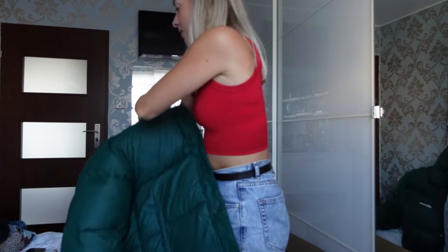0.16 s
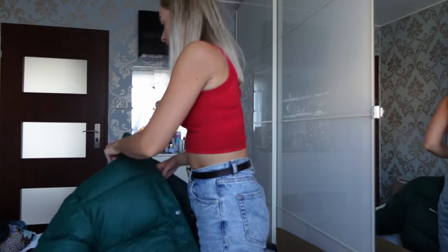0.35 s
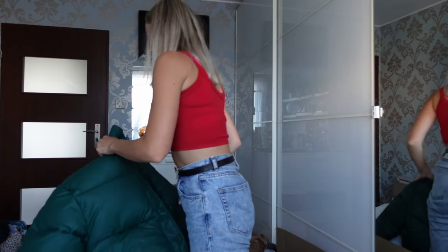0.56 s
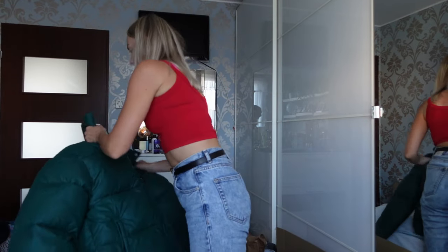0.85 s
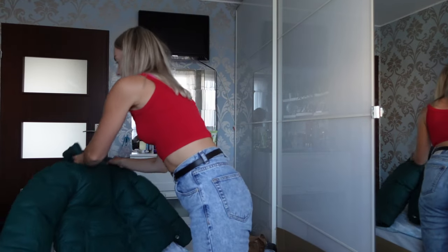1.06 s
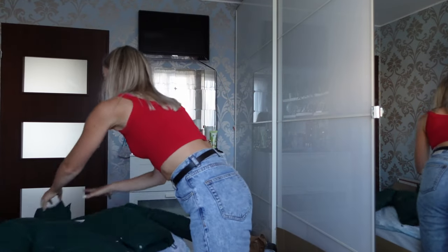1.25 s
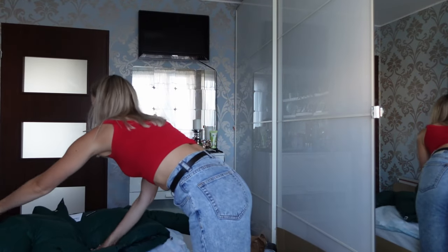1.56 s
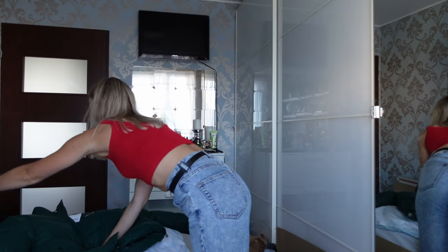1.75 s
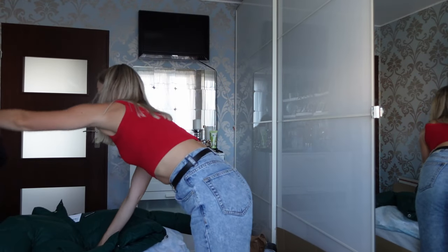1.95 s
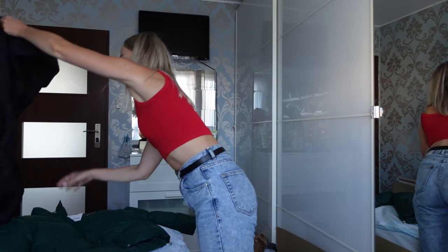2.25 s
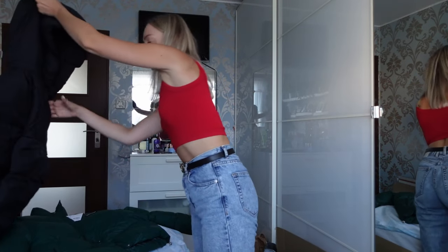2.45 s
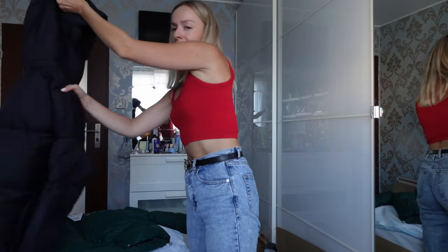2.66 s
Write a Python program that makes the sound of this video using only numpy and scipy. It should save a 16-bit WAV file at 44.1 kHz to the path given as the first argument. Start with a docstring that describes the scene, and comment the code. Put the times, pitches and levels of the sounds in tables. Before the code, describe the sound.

Close, dry rustle of padded nylon jackets in a small furnished room: dull padding rub under bright hiss, one sharp scrape and crack near the start, smaller snaps midway, a thinner lull, then a final swish.

```python
"""A small bedroom, close on the bed: padded nylon jackets are handled before two microphones,
one folded over and laid on the bed, another lifted. Shells hiss and crinkle (filtered noise and clicks)
over the duller rub, low swells and bumps of the padding. Folds rasp and snap (noise bursts), the ribbed
weave zips (gliding tones). The room answers with a diffuse decaying field, the ceiling with one echo of the folds."""
import sys
import numpy as np
from scipy import signal
from scipy.fft import rfft, irfft, next_fast_len
from scipy.io import wavfile
from scipy.ndimage import map_coordinates

SR = 44100
rng = np.random.default_rng(int(sys.argv[2]) if len(sys.argv) > 2 else 0)


def generate_wav(signal):
    """Clip the signal to [-1, 1] and save it as 16-bit WAV at the path in sys.argv[1]."""
    frames = np.transpose(np.atleast_2d(signal))
    scaled = np.clip(frames, -1, 1) * 32767
    pcm = np.round(scaled).astype(np.int16)
    wavfile.write(sys.argv[1], SR, pcm)


N = 123479  # length [samples]

# Colours give only the shape of a spectrum; stroke widths are Gaussian standard deviations.
# Room air: (frequency [Hz], level [dB])
AIR_COLOUR = [(25, -2), (60, -8), (150, 4), (400, -6.5), (1000, 6), (15000, -4)]
# Decay of the room: (frequency [Hz], time to fall 60 dB [s])
ROOM_DECAY = [(150, 0.25), (600, 0.3), (1500, 0.2), (4000, 0.2), (9000, 0.28), (15000, 0.13)]
# Likeness of the room field at the two microphones: (frequency [Hz], correlation [0-1])
ROOM_LIKENESS = [(100, 1), (500, 0.71), (1500, 0.55), (4000, 0.43), (8000, 0.25), (13000, 0.24)]
# Colour of the ceiling echo: (frequency [Hz], level [dB])
CEILING_COLOUR = [(100, -3), (1500, -4.5), (4000, 0), (10000, 3), (16000, 1.5)]

# Pressing on the padding: (time [s], level of the rub before its trim [dB])
PRESSING = [(0, -40), (.04, -53.5), (.13, -44.5), (.3, -42), (.42, -43.5), (.6, -44.5), (.75, -47),
            (.86, -46), (.96, -44), (1.17, -46.5), (1.35, -45), (1.6, -50.5), (1.8, -48), (2.0, -53.5),
            (2.22, -50), (2.43, -56.5), (2.58, -48), (2.8, -54)]
# Dull rub of the padding: (frequency [Hz], level [dB])
RUB_COLOUR = [(30, -59), (100, -43), (200, -33), (260, -28.5), (330, -20.5), (430, -10), (520, .5),
              (650, -6), (790, 1.5), (1400, 2), (2200, -.5), (4000, -16), (10000, -53.5)]
# Hands scuffing the padding: (time [s], level [dB], width [s], pitch ratio of the hollow under the hand)
SCUFF_STROKES = [(.062, -46, 0.011, 0.63), (.088, -41, 0.015, 0.99), (.128, -42.5, 0.033, 0.98),
                 (.468, -43.5, 0.023, .95), (.511, -36, 0.0087, 0.94), (.688, -41.5, 0.015, 0.91),
                 (.98, -41, 0.0077, 1.13), (1.28, -40.5, 0.026, 1.05), (1.338, -41.5, 0.016, 0.57),
                 (1.72, -47.5, 0.0095, 1.05), (1.848, -54, 0.011, 0.72), (1.895, -47, .011, 1.32),
                 (2.668, -42.5, 0.028, 1.28)]
# Scuff: (frequency [Hz], level [dB])
SCUFF_COLOUR = [(100, -51), (250, -41), (450, -15.5), (680, -15), (880, 3.5), (1100, -12.5), (1420, 6),
                (1750, -5.5), (2300, -6.5), (3500, -17), (10000, -64)]
# Low soft swells of the padding, puffs and stretches where the rub is fuller:
# (time [s], level [dB], width [s])
LOW_SWELLS = [(.285, -54.5, 0.013), (.44, -57, 0.054), (.625, -56, .012), (.685, -47.5, .011),
              (.9, -62.5, 0.034), (1.245, -43.5, 0.011), (1.272, -46, 0.015), (1.33, -45.5, 0.018),
              (1.48, -59, 0.031)]
# Low swell: (frequency [Hz], level [dB])
LOW_SWELL_COLOUR = [(30, -44), (80, -33), (160, -28), (300, -6), (550, 6.5), (1000, -6), (2500, -24),
                    (8000, -40)]
# Soft bumps of the whole bundle: (time [s], level [dB], width [s])
BUMP_STROKES = [(.025, -62.5, 0.0094), (.308, -64, 0.013), (1.268, -62, 0.011)]
# Bump: (frequency [Hz], level [dB])
BUMP_COLOUR = [(25, -31), (70, -26), (130, 2), (190, -8), (300, -5), (800, -21), (4000, -58)]

# Sliding of the shells: (time [s], level of the hiss [dB], level of the sheen before its trim [dB])
SLIDING = [(0, -42.5, -42.5), (.07, -43, -50), (.24, -41, -55), (.4, -43, -52.5), (.56, -44.5, -52.5),
           (.72, -41.5, -49.5), (.89, -45, -52), (1.02, -43.5, -47), (1.14, -42.5, -44),
           (1.25, -39.5, -46.5), (1.38, -42.5, -51.5), (1.5, -45.5, -49), (1.62, -50, -63),
           (1.72, -42.5, -47), (1.84, -46, -53), (2.02, -47.5, -59.5), (2.2, -46, -49), (2.33, -50, -56),
           (2.46, -51.5, -54), (2.6, -42.5, -52.5), (2.8, -45.5, -52.5)]
# Hiss of nylon on nylon: (frequency [Hz], level [dB])
HISS_COLOUR = [(60, -39), (300, -34), (900, -6.5), (2000, -2), (3500, 0.5), (5200, -1), (7000, -6.5),
               (10000, -13.5), (16000, -25.5)]
# Finer sheen in the top treble: (frequency [Hz], level [dB])
SHEEN_COLOUR = [(100, -59), (2000, -37), (5000, -1.5), (7500, -0.5), (9500, -3), (12000, -6.5),
                (15500, -14.5)]
# Short bright bursts of hiss, being swishes of the shells, the ragged tail of a snap
# and the breathy onset of a zip: (time [s], level [dB], width [s], pitch ratio, higher is brighter)
HISS_BURSTS = [(.115, -41.5, 0.02, 1.13), (.283, -34.5, 0.01, 0.98), (.372, -37, .0077, 0.78),
               (.475, -42, 0.027, 1.24), (.625, -44.5, 0.026, 1.4), (.705, -43, 0.029, 0.5),
               (.765, -51, 0.011, 0.45), (1.117, -37.5, .0043, 1.6), (1.2, -36, 0.0089, 0.77),
               (1.32, -32.5, 0.019, 0.99), (1.485, -44.5, 0.046, 0.88), (1.669, -41, 0.0055, 1.35),
               (1.745, -42, 0.011, 0.81), (1.846, -42, .007, 0.61), (2.195, -45, 0.036, 0.72),
               (2.395, -48, 0.019, 1.8), (2.492, -45.5, 0.015, 0.9), (2.562, -42, 0.023, 1.02),
               (2.663, -34.5, 0.024, 1.05)]
# Burst of hiss: (frequency [Hz], level [dB])
BURST_COLOUR = [(60, -68), (300, -42), (700, -12), (1500, -6.5), (3500, -2), (5300, -1.5), (7300, -4),
                (9500, -11.5), (15500, -21)]

# Whistles of the ribbed weave under a quick slide:
# (time [s], length [s], start pitch [Hz], end pitch [Hz], peak level before the weave's colour [dB])
ZIP_SLIDES = [(0.168, .02, 11650, 11650, -49.5), (0.343, 0.014, 11700, 11700, -49),
              (1.1095, 0.005, 11950, 11950, -40), (1.115, 0.0054, 11900, 11870, -36),
              (1.332, .027, 11750, 11650, -47), (1.362, 0.021, 11100, 11100, -44),
              (1.644, .018, 11660, 11800, -43.5), (1.658, 0.016, 3970, 9100, -35.5)]
# What the fine ribs radiate: (frequency [Hz], level [dB])
WEAVE_COLOUR = [(100, -52), (1500, -15), (3500, 1), (12000, 0), (15500, -4)]

# Jerks of a big fold scraping through: (time [s], level [dB], width [s])
FOLD_JERKS = [(.1655, -21.5, 0.0011), (.1752, -20.5, 0.0041), (.1853, -30.5, 0.0023), (.199, -33.5, 0.0057),
              (.227, -41, 0.0065)]
# Buckling fold: (frequency [Hz], level [dB])
BUCKLE_COLOUR = [(150, -48), (450, -20), (1300, -1), (2800, 5.5), (4000, 1), (5500, -7.5), (7000, -25),
                 (15000, -34)]
# Snaps of taut cloth: (time [s], peak before the colour [dB], pitch ratio, lower for slack cloth)
CLOTH_SNAPS = [(.2655, -12.5, 1), (0.978, -28, 0.54), (1.183, -20.5, .97), (1.2697, -27, 1),
               (1.849, -33, 0.69), (1.887, -30, 0.69)]
# Snap: (frequency [Hz], level [dB])
SNAP_COLOUR = [(100, -56), (400, -11.5), (800, -5), (1500, 0), (3200, 0), (4500, 6.5), (6000, 3.5),
               (7500, -11.5), (9400, 1), (11000, -15), (15500, -22)]

AIR_DB = -74.5
ROOM_DELAY_S = 0.0043
ROOM_DB, FOLD_ROOM_DB = -0.5, -1.5  # room field against the direct sound
CEILING_S, CEILING_DB = 0.0055, -5  # delay and level of the echo
CRINKLES_PER_S, CRINKLE_SPREAD_DB = 3500, 2  # mean rate; scale of the random click levels
ZIP_WANDER_HZ, ZIP_GLIDE_SCATTER = 90.6, 0.24  # pitch scatter; extra scatter per Hz of glide
SNAP_DECAY_S = 0.00096  # time to fall to 1/e
SIDE_DB = 0.27  # left raised and right lowered by this much
LOW_CUT_HZ, TOP_HZ = 93, 15800


def amp(db):
    """Decibels to gain."""
    return 10 ** (np.asarray(db) / 20)


def unit(x):
    """Scale to rms 1."""
    return x / np.sqrt(np.mean(x ** 2) + 1e-20)


def along(points, hz):
    """Read (frequency, value) points on a log frequency axis."""
    f, v = np.transpose(points)
    return np.interp(np.log(hz + 1), np.log(f + 1), v)


def curves(rows):
    """One value per sample for each column after the time."""
    s, *cols = np.transpose(rows)
    return [np.interp(np.arange(N) / SR, s, c) for c in cols]


def wobble(rate):
    """A smooth random curve, rate knots a second."""
    knots = rng.standard_normal(int(N * rate / SR) + 4)
    return map_coordinates(knots, [np.arange(N) * rate / SR])


def coloured(x, points, ratio=1, size=8192):
    """x through a causal filter of unit energy, its colour shifted in pitch by ratio."""
    hz = np.fft.rfftfreq(size, 1 / SR)
    gain = unit(amp(along(points, hz / ratio)))
    # folding the cepstrum forward makes the filter minimum phase
    cepstrum = irfft(np.log(gain))
    cepstrum[1:size // 2] *= 2
    cepstrum[size // 2 + 1:] = 0
    impulse = irfft(np.exp(rfft(cepstrum)))
    return signal.fftconvolve(x, impulse)[:N]


def swells(rows):
    """Summed gain of bell-shaped strokes."""
    t = np.arange(N) / SR
    return sum(amp(db) * np.exp(-0.5 * ((t - s) / width) ** 2) for s, db, width in rows)


def friction(colour, crinkle, flutter_db, ratio=1):
    """Smooth sliding noise plus tiny crease clicks, fluttering as the cloth catches; rms 1."""
    click_db = CRINKLE_SPREAD_DB * np.minimum(rng.exponential(size=N), 2 * np.pi)
    sizes = amp(click_db) * rng.choice([-1, 1], N)
    clicks = unit(sizes * (rng.random(N) < CRINKLES_PER_S / SR))
    share = np.clip(crinkle, 0, 1)  # part of the energy in clicks
    grain = np.sqrt(share) * clicks + np.sqrt(1 - share) * rng.standard_normal(N)
    flutter = amp(flutter_db * (wobble(44.95) + wobble(220)))
    return unit(coloured(grain * flutter, colour, ratio))


def strokes(rows, colour, crinkle, flutter_db):
    """Swells of friction, each with the colour shifted by its own pitch ratio."""
    return sum(swells([(s, db, width)]) * friction(colour, crinkle, flutter_db, ratio)
               for s, db, width, ratio in rows)


def room_air():
    """Faint steady noise of the room's air, the same at both microphones."""
    return amp(AIR_DB) * coloured(rng.standard_normal(N), AIR_COLOUR)


def bedroom(x, room_db, size=512):
    """Sound fills the room; each band's energy dies away as a diffuse field at two close microphones."""
    hop = size // 4
    frames = dict(fs=SR, nperseg=size, noverlap=size - hop)
    late = np.pad(x, (round(ROOM_DELAY_S * SR), 0))[:N]
    hz, _, bands = signal.stft(late, **frames)
    # share of the energy left after each hop
    keep = amp(-60 * hop / SR / along(ROOM_DECAY, hz)) ** 2
    energy = np.array([signal.lfilter([1 - k], [1, -k], np.abs(band) ** 2) for k, band in zip(keep, bands)])
    field = signal.stft(rng.standard_normal((2, N)), **frames)[2]
    # the mid-side balance sets the left-right correlation
    turn = np.arccos(np.clip(along(ROOM_LIKENESS, hz), -1, 1)) / 2
    spread = np.array([np.cos(turn), np.sin(turn)])[:, :, None]
    shaped = field / np.std(field) * np.sqrt(energy) * spread
    mid, side = signal.istft(shaped, **frames)[1][:, :N]
    answer = amp(room_db) * np.array([mid + side, mid - side])
    return (x + answer) / np.hypot(1, amp(room_db))


def ceiling(x):
    """A sound from one small spot comes back once, distinctly, from the ceiling."""
    late = np.pad(x, (round(CEILING_S * SR), 0))[:N]
    return x + amp(CEILING_DB) * coloured(late, CEILING_COLOUR)


def padding():
    """The filling rubs dully under the hands, swells low and soft, and bumps when it lands."""
    press_db, = curves(PRESSING)
    rub = amp(press_db - 1.95) * friction(RUB_COLOUR, crinkle=0.28, flutter_db=1.54)
    scuffs = strokes(SCUFF_STROKES, SCUFF_COLOUR, crinkle=0.2, flutter_db=0.0)
    low_swells = swells(LOW_SWELLS) * friction(LOW_SWELL_COLOUR, crinkle=0.13, flutter_db=0.4)
    bumps = swells(BUMP_STROKES) * unit(coloured(rng.standard_normal(N), BUMP_COLOUR))
    return rub + scuffs + low_swells + bumps


def shells():
    """Nylon slides on nylon: hiss, a finer sheen above it, and short bright bursts of hiss."""
    hiss_db, sheen_db = curves(SLIDING)
    hiss = amp(hiss_db) * friction(HISS_COLOUR, crinkle=0.39, flutter_db=0.55)
    sheen = amp(sheen_db + 1.0) * friction(SHEEN_COLOUR, crinkle=0.72, flutter_db=1.5)
    bursts = strokes(HISS_BURSTS, BURST_COLOUR, crinkle=0.38, flutter_db=0.4)
    return hiss + sheen + bursts


def zips():
    """Threads tick past so fast that they whistle: a tone whose pitch follows the speed of the slide."""
    t = np.arange(N) / SR
    out = np.zeros(N)
    for s, length, start_hz, end_hz, db in ZIP_SLIDES:
        progress = np.clip((t - s) / length, 0, 1)
        glide = end_hz - start_hz
        scatter = ZIP_WANDER_HZ * wobble(400) + ZIP_GLIDE_SCATTER * glide * wobble(3000)
        hz = start_hz + glide * progress + scatter
        envelope = np.sqrt(np.abs(np.sin(np.pi * progress)))
        out += amp(db) * envelope * np.sin(2 * np.pi * np.cumsum(hz) / SR)
    return coloured(out, WEAVE_COLOUR)


def folds():
    """The loud rasp of a fold scraping through and the bright snaps of taut cloth."""
    t = np.arange(N) / SR
    out = swells(FOLD_JERKS) * friction(BUCKLE_COLOUR, crinkle=0.041, flutter_db=0.0)
    for s, db, ratio in CLOTH_SNAPS:
        decay = (t >= s) * np.exp(-np.abs(t - s) / SNAP_DECAY_S)
        crack = decay * rng.choice([-1, 1], N)
        out = out + amp(db) * coloured(crack, SNAP_COLOUR, ratio)
    return out


def scene():
    """All the cloth in the bedroom over faint air; the folds face the microphones and are drier."""
    soft_cloth = bedroom(padding() + shells() + zips(), ROOM_DB)
    near_folds = bedroom(ceiling(folds()), FOLD_ROOM_DB)
    return (soft_cloth + near_folds) * amp([[SIDE_DB], [-SIDE_DB]]) + room_air()


def record(dry):
    """The microphones shed the deepest bass and keep nothing above their band limit."""
    m = next_fast_len(N + SR // 2)
    hz = np.fft.rfftfreq(m, 1 / SR)
    bass_cut = hz ** 2 / (hz ** 2 + LOW_CUT_HZ ** 2)
    return irfft(rfft(dry, m) * (hz < TOP_HZ) * bass_cut, m)[:, :N]


dry = scene()
out = record(dry)
generate_wav(out)
```